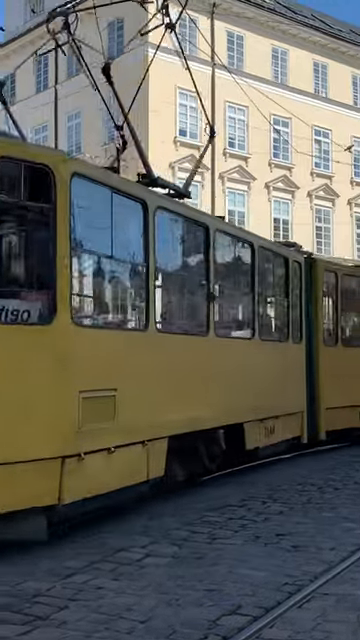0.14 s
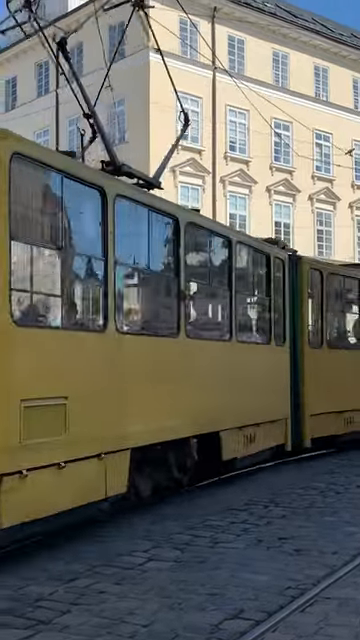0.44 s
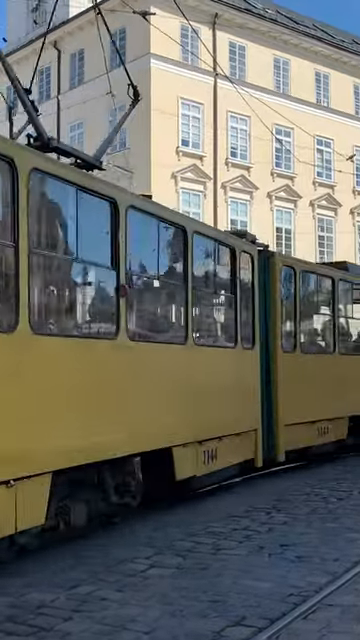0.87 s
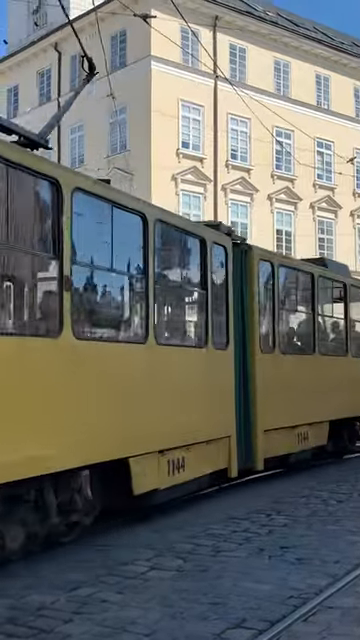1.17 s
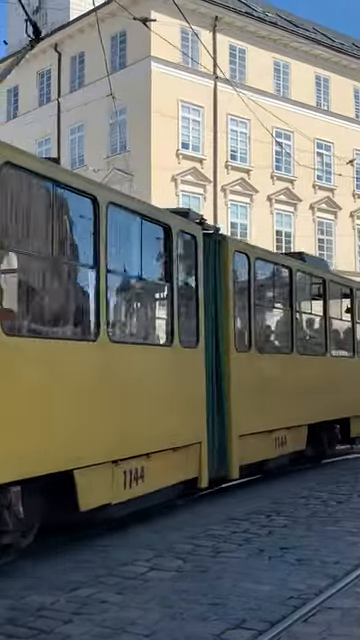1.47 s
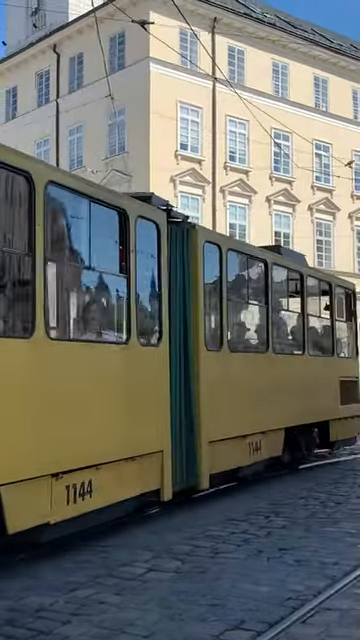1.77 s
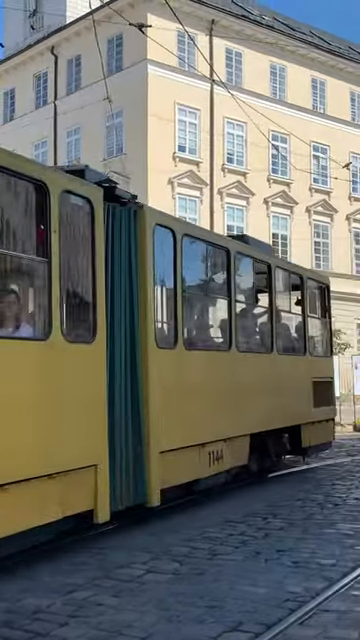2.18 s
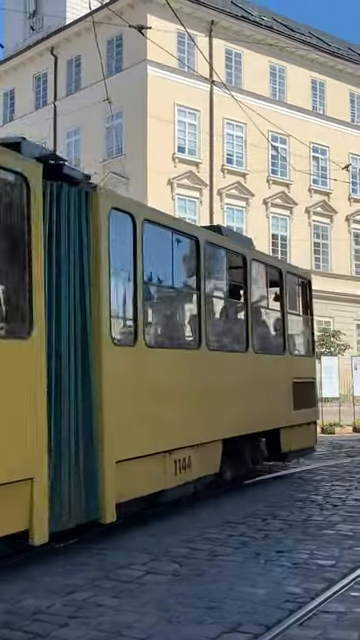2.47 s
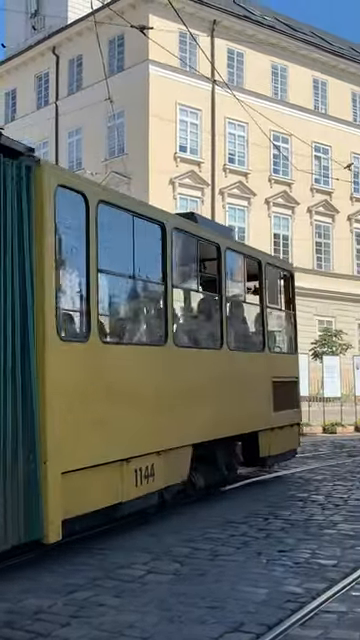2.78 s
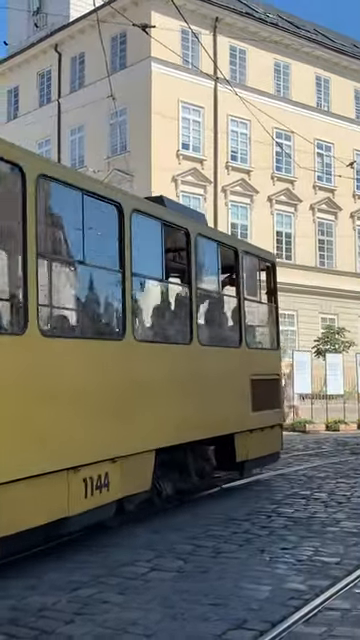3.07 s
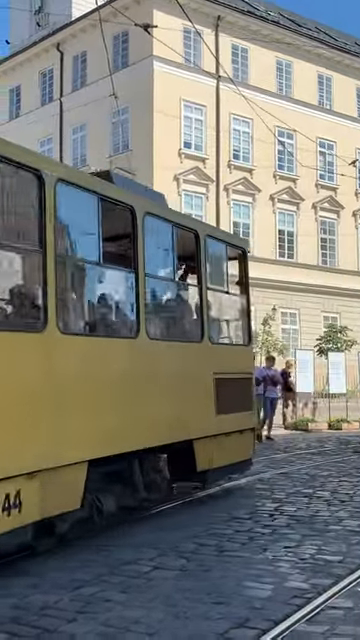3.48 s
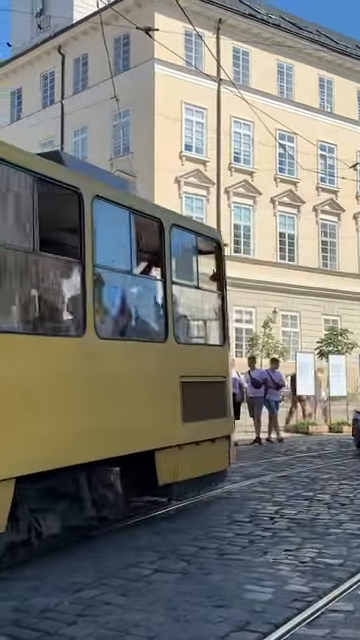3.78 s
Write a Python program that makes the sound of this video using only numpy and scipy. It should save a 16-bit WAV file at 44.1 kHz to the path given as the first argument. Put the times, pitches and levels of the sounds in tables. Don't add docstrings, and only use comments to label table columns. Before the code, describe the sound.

A tram rolls by close on a curved street track, its low rumble growing throughout. Flange hiss and short thin whines fill the first 0.5 s; a sharp plate clank hits at 0.74 s. Dull joint thuds come near 0.9, 1.6, 2.0, 2.3 and 3.0 s, with scrapes and chatter. Hiss returns after 1.8 s, wheels sing mid-low around 2.4-3.9 s, a thin wavering squeal starts at 3.1 s, and knocks cluster at 3.6 s.

```python
import sys
import numpy as np
from scipy import signal
from scipy.fft import rfft, irfft, next_fast_len
from scipy.io import wavfile
from scipy.ndimage import uniform_filter1d

SR = 44100
rng = np.random.default_rng(int(sys.argv[2]) if len(sys.argv) > 2 else 0)


def gain_from_db(level_db):
    decades = np.asarray(level_db, float) / 20
    return 10 ** decades


def int16_out(signal):
    q = np.round(np.clip(np.atleast_2d(signal).T, -1, 1) * 32767)
    wavfile.write(sys.argv[1], SR, q.astype(np.int16))


N = 173754
TIME = np.arange(N) / SR
SIZE = next_fast_len(N + SR)
FREQ = np.arange(SIZE // 2 + 1) * SR / SIZE + 1e-3


def rms_one(x):
    return x / np.sqrt(np.mean(x ** 2) + 1e-20)


def in_time(rows):
    s, *columns = np.transpose(rows)
    return [np.interp(TIME, s, column) for column in columns]


def at_hz(points):
    hz, db = np.transpose(points)
    return np.interp(np.log(FREQ), np.log(hz), db)


def colour(x, points):
    low_end = 1 / (1 + (points[0][0] / FREQ) ** 4)
    high_end = 1 / (1 + (FREQ / points[-1][0]) ** 4)
    return irfft(rfft(x, SIZE) * gain_from_db(at_hz(points)) * low_end * high_end, SIZE)[:N]


def drift(rate):
    step = 40
    r = np.exp(-2 * step * np.pi * rate / SR)
    slow = signal.lfilter([1], [1, -2 * r, r * r], rng.standard_normal(N // step + 2002))
    slow = slow[2000:]
    return np.interp(np.arange(N) / step, np.arange(len(slow)), rms_one(slow))


def resonance(x, hz, width_hz):
    r = np.exp(-np.pi * width_hz / SR)
    poles = [1, -2 * r * np.cos(2 * np.pi * hz / SR), r * r]
    return signal.lfilter([1 - r, 0, r - 1], poles, x + 1e-18)


def gate(s, length, db, rise, fall):
    u = TIME - s
    return gain_from_db(db) * np.clip(u / rise, 0, 1) * np.exp(-np.clip(u - length, 0, None) / fall)


def grit(rate, spread_db):
    return rms_one(rng.standard_normal(N) * gain_from_db(spread_db * drift(rate)))


def tone(hz, s):
    return np.sin(2 * np.pi * hz * (TIME - s))


# [t/s, level/dB]
BOGIE_NEARNESS = [(0, -30), (.75, -29.5), (.95, -26), (1.1, -28), (1.5, -24.5), (1.8, -25), (1.9, -23.5),
                  (2.3, -22), (2.6, -23), (3.05, -22), (3.3, -23), (3.55, -25), (3.65, -22), (3.94, -23)]
# [f/Hz, level/dB]
GROUND_COLOUR = [(45, 2), (58, 6.5), (80, -2), (130, 6)]
# [f/Hz, level/dB]
ROAR_COLOUR = [(120, -11), (199, -4), (341, -5), (592, -18), (961, -32.5), (1440, -24.5), (2300, -27.5)]
# [f/Hz, level/dB]
TREAD_COLOUR = [(700, -15.5), (2500, -23.5), (6900, -29.5), (11800, -33), (18000, -72)]
# [f/Hz, width/Hz, level/dB]
FRAME_MODES = [(64, 30, -8.5), (206.5, 22, -10.5), (275.7, 49, -10.5), (344, 43, -10.5), (950, 196, -12),
               (2043, 73, -25.5)]


def rolling():
    near, = in_time(BOGIE_NEARNESS)
    ground_db = -34.5 + 2.0 * TIME + 0.5 * drift(5.1)
    ground = gain_from_db(ground_db) * rms_one(colour(rng.standard_normal(N), GROUND_COLOUR))
    roar = 0.75 * rms_one(colour(grit(56, 1.0), ROAR_COLOUR))
    for hz, width_hz, db in FRAME_MODES:
        mode = rms_one(resonance(rng.standard_normal(N), hz, width_hz))
        roar = roar + gain_from_db(db + 2.0 * drift(2.95)) * mode
    hiss_db = -45 + 0.19 * (near - near.mean()) + 3.8 * drift(28.0)
    hiss = gain_from_db(hiss_db) * rms_one(colour(grit(86, 0.67), TREAD_COLOUR))
    return ground + gain_from_db(near) * roar + hiss


# [t/s, level/dB]
FLANGE_PRESSURE = [(0, -40.5), (.1, -39), (.13, -34), (.2, -42.5), (.49, -41), (.52, -59.5), (1.58, -56.5),
                   (1.64, -44.5), (1.72, -51), (1.78, -50), (1.83, -47), (1.88, -40.5), (2.6, -38),
                   (3.36, -37.5), (3.41, -50.5), (3.6, -38.5), (3.7, -43.5), (3.94, -41)]
# [f/Hz, level/dB]
RUB_COLOUR = [(1500, -17), (3000, 6), (6000, -2), (10000, 1.5), (13000, 3.5), (19000, 5.5)]
WHEEL_MODES_HZ = [2720, 4115, 5470, 6830, 8300, 9790, 11330, 12930, 14520]
# [width/Hz, front bogie level/dB, rear bogies level/dB]
WHEEL_MODES = [(70, -18, -27), (130, -15, -23), (70, -14, -21), (90, -8, -17), (160, -8, -14),
               (160, -10, -13), (100, -6, -13), (160, -9, -12), (260, -9, -11)]


def flanges():
    front_gone_s, mode_flicker_db, rub_flicker_db = 1.0, 3.5, 1.7
    rub = grit(41, 0.5)
    out = 1.185 * rms_one(colour(rub, RUB_COLOUR))
    for hz, (width_hz, front_db, rear_db) in zip(WHEEL_MODES_HZ, WHEEL_MODES):
        db = np.where(TIME < front_gone_s, front_db, rear_db) + mode_flicker_db * drift(8.8)
        ring = resonance(resonance(rub, hz, width_hz), hz, 2 * width_hz)
        out = out + gain_from_db(db) * rms_one(ring)
    pressure_db, = in_time(FLANGE_PRESSURE)
    return gain_from_db(pressure_db + rub_flicker_db * drift(39)) * out


# [t/s, length/s, f/Hz, level/dB]
WHINE_SPELLS = [(.07, .06, 1630, -41), (0.7, .12, 2500, -46), (0.4, .05, 1630, -43), (.23, .06, 1100, -47),
                (.04, .09, 1900, -44), (.08, .08, 3900, -45), (.43, .08, 3290, -45), (0, .12, 5470, -52),
                (0.3, .1, 5470, -41), (2, .16, 5940, -48), (.48, .04, 4150, -50), (0.4, .07, 10000, -48)]


def whines():
    wander = 2 * np.pi * np.cumsum(20.3 * drift(44)) / SR
    flicker = gain_from_db(2.3 * drift(30))
    out = 0
    for s, length, hz, db in WHINE_SPELLS:
        out = out + gate(s, length, db, rise=0.013, fall=0.012) * np.sin(2 * np.pi * hz * TIME + wander)
    return flicker * out


# [t/s, length/s, level/dB, high mode relative level/dB]
CHATTER_BURSTS = [(0.068, 0.035, -48, -22), (0.467, 0.019, -43, -13), (0.949, 0.033, -39.5, -11),
                  (1.157, 0.011, -35, -15), (1.425, 0.022, -45, -4), (1.573, 0.03, -45.5, -8),
                  (2.168, 0.032, -42, -7), (2.279, 0.02, -50.5, 17), (2.744, 0.039, -40.5, 5),
                  (2.93, 0.015, -36, -3), (3.052, 0.036, -35.5, -8), (3.256, 0.03, -32, -8),
                  (3.446, 0.015, -39.5, -3.5), (3.629, .015, -35, 3.5), (3.649, 0.006, -33, -3),
                  (3.658, .025, -41, -11), (3.743, 0.038, -30.5, -8.5)]
# [t/s, length/s, level/dB]
SCRAPE_BURSTS = [
    (0.466, 0.033, -38.5),
    (1.213, 0.029, -40.5),
    (1.62, 0.073, -41.5),
    (2.148, 0.028, -35.5),
    (2.263, 0.038, -36.5),
    (2.284, 0.0092, -38),
    (3.02, .05, -37.5),
    (3.591, 0.07, -36),
    (3.609, 0.0092, -27.5),
    (3.663, 0.012, -29.5),
]
# [f/Hz, level/dB]
SCRAPE_COLOUR = [(1200, 8), (2900, 9), (4500, 2.5), (7000, 3), (9000, 1.5), (15000, -2)]


def rattles():
    low_hz, high_hz, width_hz = 1975, 4580, 130
    low = sum(gate(s, d, db, 0.00096, 0.014) for s, d, db, _ in CHATTER_BURSTS)
    high = sum(gate(s, d, db + up, 0.0017, 0.0045) for s, d, db, up in CHATTER_BURSTS)
    shake = grit(87, 2.0)
    low = resonance(low * rms_one(resonance(shake, low_hz, width_hz)), low_hz, 570)
    high = resonance(high * rms_one(resonance(shake, high_hz, width_hz)), high_hz, 720)
    scrape = sum(gate(s, d, db, 0.0044, 0.008) for s, d, db in SCRAPE_BURSTS)
    return low + high + scrape * rms_one(colour(grit(270, 3.5), SCRAPE_COLOUR))


# [t/s, length/s, level/dB]
SINGING_SPELLS = [(0.27, 0.5, -55), (1.583, 0.09, -36.5), (2.274, 0.12, -37.5), (2.426, 0.13, -32),
                  (2.545, 0.082, -28), (2.657, 0.052, -36.5), (3.02, 0.1, -39), (3.092, 0.083, -33.5),
                  (3.198, .07, -40.5), (3.348, 0.27, -37), (3.58, 0.11, -32), (3.706, 0.2, -38.5)]


def singing():
    hz, spread_hz, edge_s, octave_db = 553, 3, 0.028, -25
    lead = np.array([[2.2], [0]])
    phase = 2 * np.pi * np.cumsum(hz + spread_hz * drift(16.5)) / SR + lead
    level = sum(gate(s, d, db, edge_s, edge_s / 2) for s, d, db in SINGING_SPELLS)
    level = level * gain_from_db(11.0 + 1.0 * drift(34))
    return level * (np.sin(phase) + gain_from_db(octave_db) * np.sin(2 * phase))


# [f/Hz, width/Hz, level/dB]
PLATE_MODES = [(870, 67, -15), (970, 110, 7.5), (1280, 200, -3), (2520, 460, -10), (3430, 710, -7),
               (5250, 570, -17), (6850, 520, -6), (9800, 1400, -3), (11600, 3400, -11), (14500, 1200, -24)]
# [f/Hz, level/dB, time to fall 60 dB/s]
CLANK_PARTIALS = [(902, -17, .035), (1694, -15, 0.057), (2030, -16, 0.058), (2430, -27.5, 0.081),
                  (2837, -35, 0.12), (3270, -30, 0.12), (3470, -31, .05), (3630, -28, 0.067),
                  (3950, -33, 0.11)]


def clank():
    crack_s, boom_s, boom_hz = 0.7388, 0.746, 972
    bounce_s, bounce_db, rise_s = 0.03, -15, 0.003
    shake = grit(310, 1.2)
    modes = [gain_from_db(db) * rms_one(resonance(shake, hz, width_hz)) for hz, width_hz, db in PLATE_MODES]
    plate = rms_one(sum(modes))
    crack = gate(crack_s, 0.01, -17, rise=0.0026, fall=0.005) * plate
    boom = gate(boom_s, 0.0075, -6, rise=0.004, fall=0.003) * tone(boom_hz, boom_s)
    hum = gate(boom_s, 0, -28, rise=0.0036, fall=0.11) * rms_one(resonance(shake, boom_hz, 75))
    tail = gate(crack_s, 0, -27, rise=0.011, fall=0.035) * rms_one(resonance(plate, boom_hz, 1800))
    partials = 0
    for hz, db, t60 in CLANK_PARTIALS:
        for s, less_db in [(crack_s, 0), (crack_s + bounce_s, bounce_db)]:
            partials = partials + gate(s, rise_s, db + less_db, rise_s, t60 / 7) * tone(hz, s)
    roughness_db = 3 * rms_one(uniform_filter1d(shake, size=130))
    return crack + partials * gain_from_db(roughness_db) + boom + tail + hum


# [t/s, level/dB, f/Hz]
JOINT_THUDS = [
    (0.913, -15, 124),
    (1.603, -10, 390),
    (1.605, -15, 210),
    (1.612, -11, 324),
    (2.033, -16, 320),
    (2.28, -15, 332),
    (3.011, -11.5, 330),
]


def thuds():
    t60_s = 0.042
    return sum(gate(s, 0.0018, db, 0.0018, t60_s / 7) * tone(hz, s) for s, db, hz in JOINT_THUDS)


# [t/s, width/s, f/Hz, level/dB]
FRAME_SURGES = [(1.3, 0.045, 344, -28.5), (1.38, 0.045, 408.8, -30.5), (1.69, .015, 375, -22.5),
                (1.80, 0.015, 338, -22.5), (1.89, 0.018, 343.5, -17.5), (1.93, 0.025, 282, -19.5),
                (2.06, 0.025, 336, -19), (2.17, 0.021, 246, -22), (2.26, 0.022, 215, -18),
                (2.31, 0.019, 291.4, -17), (2.41, 0.056, 207.5, -20.5), (2.49, 0.022, 287.7, -17),
                (2.67, 0.027, 212, -20), (2.82, 0.022, 188.3, -22), (2.85, 0.043, 324.7, -24),
                (2.99, 0.055, 181.3, -19.5), (3.07, 0.033, 199.3, -21), (3.251, 0.018, 210, -26),
                (3.401, 0.039, 181.7, -23), (3.55, 0.035, 264, -22.5), (3.77, 0.046, 272, -26.5),
                (3.76, 0.033, 324.4, -22.5)]


def surges():
    out = 0
    for s, width_s, hz, db in FRAME_SURGES:
        out = out + gain_from_db(db) * np.exp(-.5 * ((TIME - s) / width_s) ** 2) * tone(hz, s)
    return out


# [t/s, f/Hz, level/dB]
SQUEAL_PATH = [(3.12, 12800, -49), (3.19, 12500, -46), (3.26, 11960, -45.5), (3.33, 11520, -44.5),
               (3.43, 12640, -50), (3.48, 12200, -48), (3.55, 11900, -43), (3.6, 12100, -41),
               (3.66, 12500, -43), (3.73, 12450, -43), (3.77, 11800, -45), (3.81, 12130, -43),
               (3.85, 11700, -42), (3.89, 12240, -46), (3.94, 11150, -42)]


def squeal():
    wobble_hz, flutter_db = 90, 5.5
    hz, db = in_time(SQUEAL_PATH)
    pitch = uniform_filter1d(hz, size=900) + wobble_hz * (drift(7) + drift(153))
    phase = 2 * np.pi * np.cumsum(pitch) / SR
    started = TIME > SQUEAL_PATH[0][0]
    return gain_from_db(db + 5.5 + flutter_db * drift(46)) * np.sin(phase) * started


# [t/s, level/dB, f/Hz]
BRACKET_KNOCKS = [
    (3.5985, -25, 2410),
    (3.6145, -17, 2900),
    (3.6136, -30, 6850),
    (3.629, -14.5, 1990),
    (3.6656, -29, 2650),
    (3.667, -33, 5180),
]


def knocks():
    t60_s = 0.04
    return sum(gate(s, .001, db, 0.00048, t60_s / 7) * tone(hz, s) for s, db, hz in BRACKET_KNOCKS)


# [f/Hz, level/dB]
STREET_ECHO = [(60, -16.5), (300, -6.5), (700, 3), (5500, 9), (7000, -3), (9000, -14), (16000, -10)]


def street():
    wall_gain = 0.45
    delay_s = rng.uniform(.003, .022, (4, 2, 1))
    delay = np.exp(-2j * np.pi * FREQ * delay_s)
    bounces = (delay - wall_gain) / (1 - wall_gain * delay)
    return np.prod(bounces, axis=0) * gain_from_db(at_hz(STREET_ECHO))


def run_in(x):
    before = x[..., SIZE - N - 1::-1]
    return rfft(np.concatenate([x, before], axis=-1))


def port_lag(table):
    return np.exp(-1j * np.interp(FREQ, *np.transpose(table)) * [[1], [0]])


# [f/Hz, phase/rad]
LAG_TRAM = [(0, 0), (430, -.6), (950, .3), (1460, 2.5), (2930, 3.5), (6550, 5.9), (7670, 9.15),
            (9300, 9.65), (10200, 12.45), (11600, 12.65), (12500, 15.2), (14100, 16.05), (15200, 18.9),
            (22050, 18.9)]
# [f/Hz, phase/rad]
LAG_BLOWS = [(0, 0), (5900, 0), (15900, 4 * np.pi), (22050, 6.4 * np.pi)]
# [f/Hz, phase/rad]
LAG_RATTLES = [(0, 0), (3000, .65 * np.pi), (5900, 0), (15900, 4 * np.pi), (22050, 6.4 * np.pi)]
# [f/Hz, level/dB]
PORT_BALANCE = [(60, 2.5), (300, 3), (1000, 5.5), (2500, 2), (5000, -2.5), (7500, 0), (16000, 1)]


def scene():
    near_echo_db, rattle_echo_db, wander_rad = -22, -15, 2.92
    steady = run_in(rolling() + flanges() + whines() + surges() + squeal())
    loose = rfft(rattles() + knocks(), SIZE)
    blows = rfft(clank() + thuds(), SIZE)

    turn = wander_rad * np.array([drift(1.8), drift(2.08)])
    in_step = irfft(steady, SIZE)[:N]
    quarter_turn = irfft(-1j * steady, SIZE)[:N]
    moving = run_in(np.cos(turn) * in_step + np.sin(turn) * quarter_turn)

    echo = street()
    both = steady * port_lag(LAG_TRAM) + moving * echo
    both = both / np.sqrt(1 + gain_from_db(2 * at_hz(STREET_ECHO)))
    both = both + blows * (port_lag(LAG_BLOWS) + gain_from_db(near_echo_db) * echo)
    both = both + loose * (port_lag(LAG_RATTLES) + gain_from_db(rattle_echo_db) * echo)
    both = both + rfft(singing(), SIZE)
    balance = gain_from_db(at_hz(PORT_BALANCE) * [[.5], [-.5]])
    return irfft(both * balance, SIZE)[:, :N]


def band_limit(x):
    return signal.sosfilt(signal.butter(12, 17020, fs=SR, output="sos"), x)


def record(dry):
    low_cut = signal.butter(4, 44.5, "high", fs=SR, output="sos")
    top_cut = signal.ellip(8, .5, 60, 15550, fs=SR, output="sos")
    mix = signal.sosfilt(np.vstack([low_cut, top_cut]), dry)
    return band_limit(mix)


dry = scene()
out = record(dry)
int16_out(out)
```